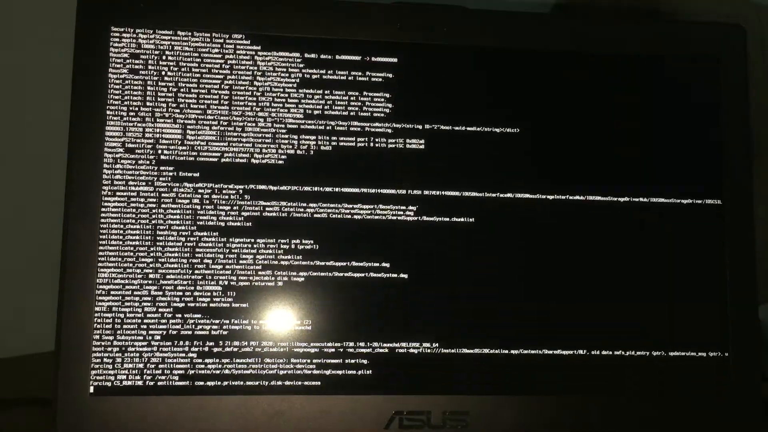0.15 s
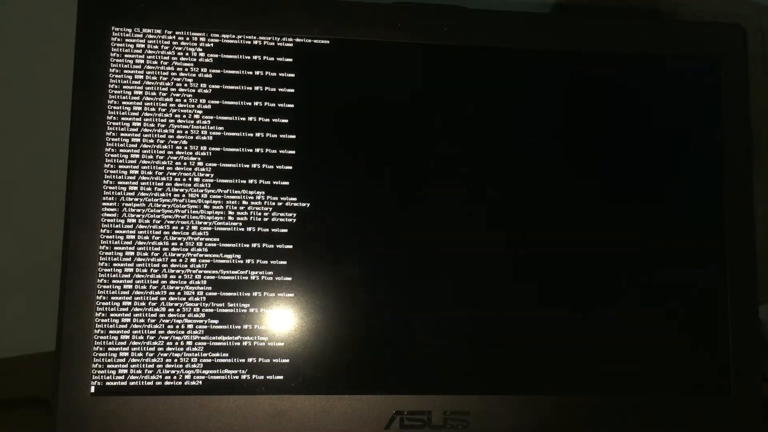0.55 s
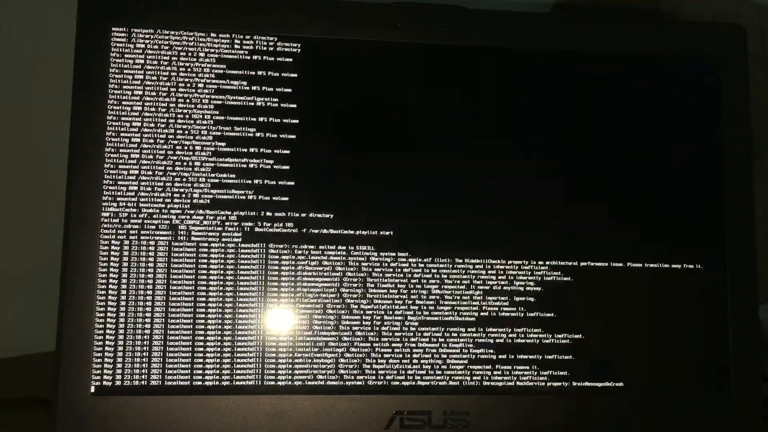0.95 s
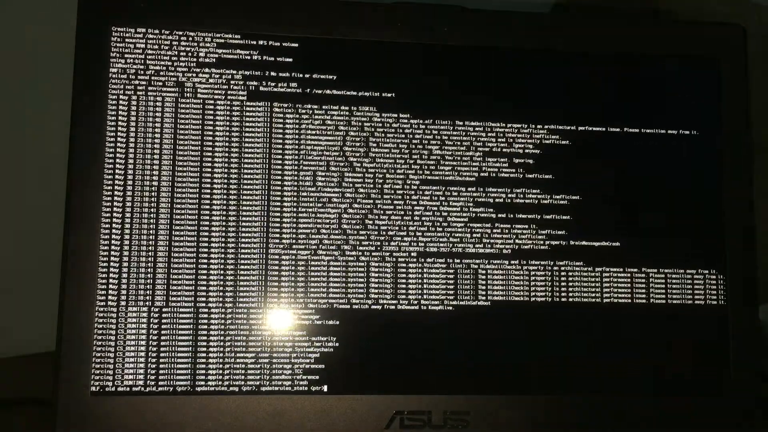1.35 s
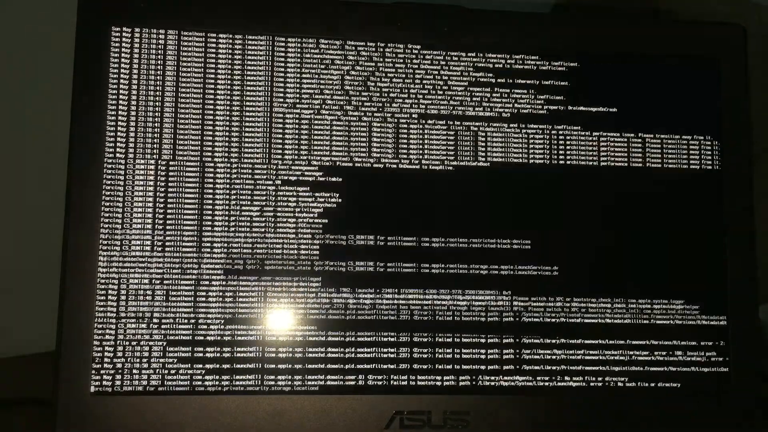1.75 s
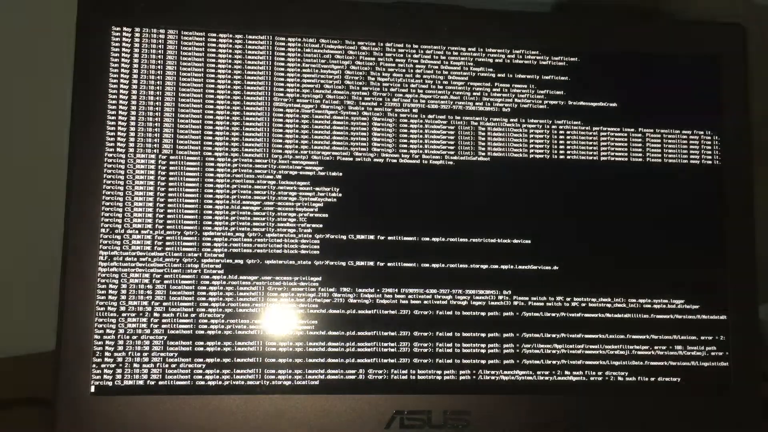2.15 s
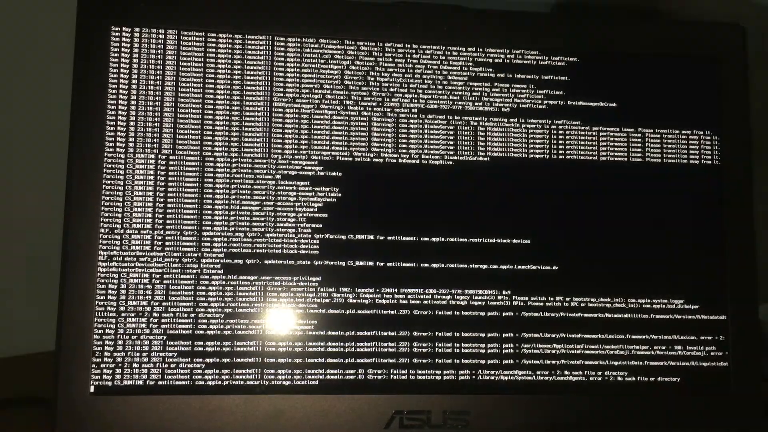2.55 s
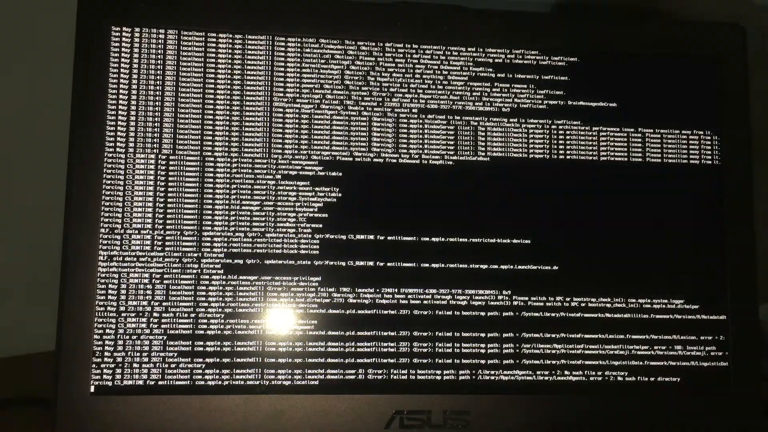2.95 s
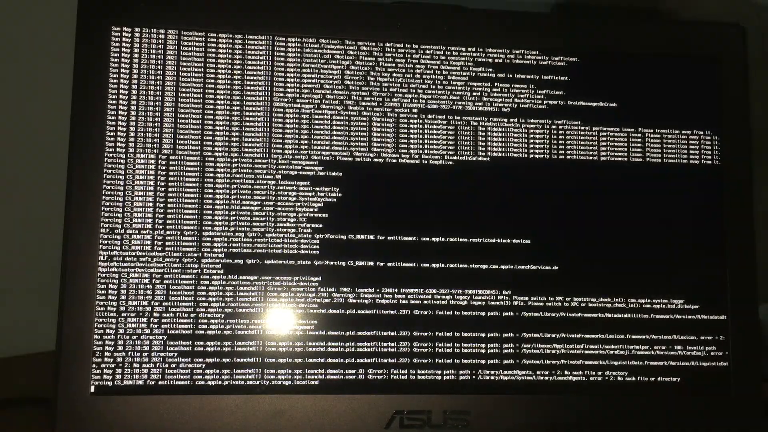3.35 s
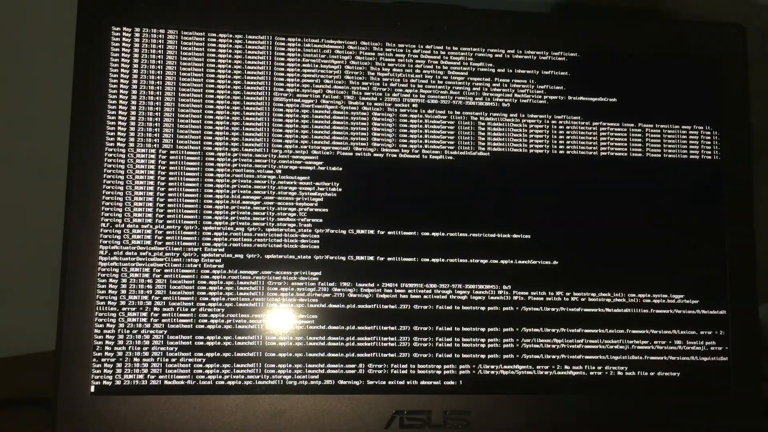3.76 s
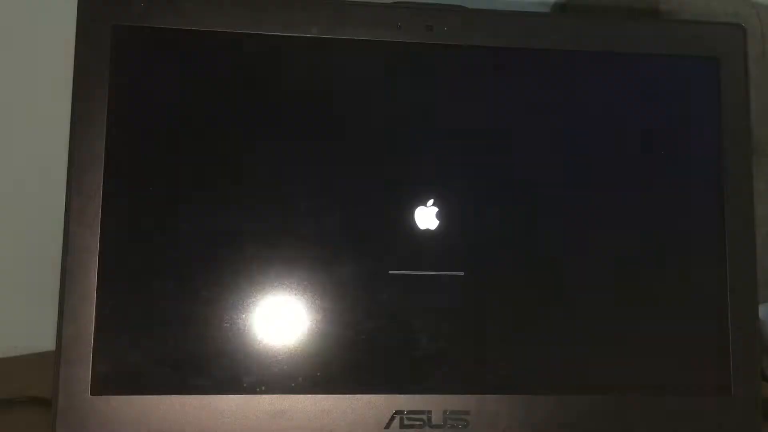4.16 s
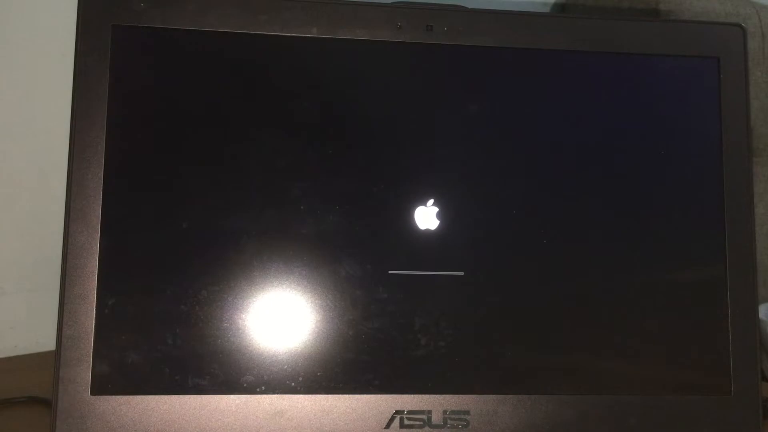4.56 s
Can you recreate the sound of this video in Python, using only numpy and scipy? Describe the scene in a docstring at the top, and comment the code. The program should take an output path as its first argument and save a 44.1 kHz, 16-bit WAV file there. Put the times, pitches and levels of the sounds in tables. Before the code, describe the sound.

Steady air noise rushes through a laptop's vents, slightly grainy and hollow from the case, with several weak high whines and a barely audible low hoot coming and going. Over it, fingers on the phone make bright dry ticks, some with soft low thuds, and a few tiny chirping clicks stand out. Faint disk-arm ticks cluster late. Mono, close, hand-held, in a quiet room with hardly any reverberation.

```python
"""Air hisses without a break through a laptop's vents and case cavities, close to a hand-held phone in
a quiet room: noise, coloured and lifted at the cavities. Thin whines, a fan tone that steps down and
a low, fading hoot are wavering sines; short blips are sliding sines. Fingers tick (dying noise) and
thud (a push on a ringing shell) on the phone, the disk arm ticks with its own modes, and the microphone hisses."""
import sys
import numpy as np
from scipy import signal
from scipy.fft import rfft, irfft, next_fast_len
from scipy.io import wavfile
from scipy.ndimage import uniform_filter1d, map_coordinates

SR = 44100
rng = np.random.default_rng(int(sys.argv[2]) if len(sys.argv) > 2 else 0)


def linear_from_db(decibels):
    """Turn decibels (scalar or array-like) into linear amplitude factors; 0 gives 1."""
    return 10 ** (np.asarray(decibels, float) / 20)


def file_out(sig):
    """Save sig as 16-bit WAV at sys.argv[1]."""
    # one column per channel
    cols = np.atleast_2d(sig).T
    # limit, then scale
    lim = np.clip(cols, -1, 1)
    pcm = np.round(lim * 32767).astype(np.int16)
    wavfile.write(sys.argv[1], SR, pcm)


N = 208054  # length in samples

# colour of the air noise before the cavities lift it: pitch_hz, relative level_db (per Hz)
AIR_COLOUR = [(20, -38), (150, -41), (600, -37.5), (720, -24.5), (1100, -21), (1400, -13), (1650, -20),
              (1800, -13.5), (2300, -13), (3200, -5.5), (4000, -3.5), (5000, -12), (5600, -19),
              (7500, -25.5), (10000, -35.5), (16500, -33)]
# pitches of the case cavities that the air excites: pitch_hz
CAVITY_PITCHES = [745, 1225, 1280, 2400, 2580, 2880, 2945, 3760, 4020, 4340, 4580, 5250, 5685, 6420]
# shape of each cavity, in the same order: width_hz, lift_db over the air
CAVITY_SHAPES = [(40.4, 8), (67, 7.8), (98, 8.8), (114, 10), (80.5, 6.2), (143, 10.96), (68, 9.2), (152, 6),
                 (50.4, 5), (99, 1.2), (99, 1.9), (100, 4.5), (61, 3.5), (100, 2.5)]
# steady whines: pitch_hz, level_db (rms), wander_hz, flutter_db
WHINES = [(978, -82, 1, 1.5), (1186, -81, 2, 2), (1221, -77, 5, 6), (1323, -64.3, 1.2, 1.5),
          (1921, -79, 2, 2), (1944, -74.5, 3, 2), (2004, -71.5, 4, 2.5), (2350, -64, 1.5, 2.5),
          (4020, -70, 8, 3)]
# fan blade tone, stepping down once: start_s, pitch_hz, level_db (rms)
BLADE_TONE = [(0, 1526, -66), (2.13, 1526, -67), (2.27, 1487, -71), (4.72, 1486, -69)]
# short rounded blips: peak_s, level_db (peak), start_hz, end_hz, length_s
SLIDING_BLIPS = [(.627, -51.5, 980, 850, .01), (.8282, -35.5, 2750, 2050, .006),
                 (1.2683, -28.5, 2150, 2500, .0026), (1.93, -68, 950, 840, .09),
                 (2.071, -40, 1800, 1100, .002), (2.245, -65, 680, 600, .014), (2.5, -67, 836, 834, .27),
                 (2.5017, -31, 2700, 1900, .0016), (2.502, -44, 1500, 1000, .0025),
                 (2.508, -38, 3600, 2300, .007), (2.59, -66, 790, 740, .06)]
# finger ticks on the shell: start_s, level_db (crackle rms before its fade), centre_hz, t60_s (3 ms at least)
FINGER_TICKS = [(0.0578, -39.5, 9600, 0.022), (0.0926, -43, 12000, 0.01), (.121, -52, 11300, .019),
                (.1732, -46, 11400, 0.026), (0.247, -51, 14700, .009), (.2684, -54, 7250, 0.022),
                (.3063, -45, 11900, .008), (.581, -55, 9000, 0.014), (.6912, -56, 13900, .036),
                (1.188, -50, 11700, .006), (1.1908, -46.5, 8500, .022), (1.2678, -51, 13900, .013),
                (1.517, -47.5, 11400, .025), (1.579, -51, 7700, .009), (1.9823, -41.5, 9700, 0.022),
                (2.175, -52.5, 13000, .032), (2.2416, -54, 11100, .009), (2.488, -50, 11000, .019),
                (2.5012, -32.5, 11300, .017), (2.5345, -53, 7860, .021), (2.6246, -48.5, 9700, .007),
                (2.8599, -48, 12700, .008), (2.9418, -47.5, 12000, 0.014), (3.0978, -47.5, 12800, .024),
                (3.153, -47, 12700, .008), (3.1578, -46.5, 13500, .016), (3.8494, -48.5, 13700, .01),
                (3.8754, -44, 14100, .008), (3.9341, -57, 11400, .014), (3.957, -49.5, 9600, .011)]
# low thuds of the shell, most of them under the finger ticks: start_s, level_db (peak), centre_hz
SHELL_THUDS = [(.0576, -47, 269), (0.0933, -63, 400), (.121, -61, 300), (.1732, -51, 430),
               (0.1927, -70, 400), (1.0933, -59.5, 540), (1.1877, -66, 400), (1.517, -46, 510),
               (1.58, -70, 400), (1.9822, -45.5, 370), (2.174, -67, 400), (2.4877, -59, 300),
               (2.5007, -75, 400), (2.625, -59.5, 450), (2.9425, -69, 400), (3.0974, -63, 500),
               (3.8496, -65, 250), (3.875, -66, 250), (3.9333, -64, 280)]
# modes of the phone's shell: pitch_hz, width_hz, relative level_db
SHELL_MODES = [(126, 200, 6.5), (322, 82, 6), (584, 150, 5.5), (980, 240, 7)]
# disk arm seeks: start_s, relative level_db
ARM_SEEKS = [(0.2283, -54.5), (3.585, -57), (3.7043, -56.5), (3.797, -57), (3.8851, -56.5), (4.5128, -56.5)]
# what the arm rings with: pitch_hz, relative level_db, time to the peak_s
ARM_MODES = [(13050, -7, 0.0014), (11600, -14.5, 0.0024), (11400, -3, 0.0033), (10800, -2, 0.00062),
             (9500, -1.5, 0.0036), (7900, -8, 0.0049), (7700, -6, 0.0035)]
# a few hand-placed humps of the hoot, some faint: peak_s, level_db (rms), length_s
HOOT_HUMPS = [(0.047, -72.5, .16), (0.256, -71.5, .18), (0.497, -81, 0.25), (0.713, -79, 0.053),
              (1.798, -72, 0.13), (2.105, -78, .12), (2.24, -67.5, 0.084), (2.779, -63, 0.036),
              (2.832, -61, 0.07), (3.232, -65.5, 0.017), (3.852, -70, 0.16), (4.063, -77, .2),
              (4.261, -72, 0.08), (4.558, -73.5, 0.11)]


def unit(x):
    """Scaled to rms 1."""
    return x / np.sqrt(np.mean(x ** 2) + 1e-20)


def wobble(rate):
    """A smooth curve through random knots, rate of them a second."""
    knots = rng.standard_normal(int(N * rate / SR) + 4)
    return map_coordinates(knots, [np.arange(N) * rate / SR])


def curves(rows):
    """One value per sample for each column after the time."""
    times, *columns = np.transpose(rows)
    return [np.interp(np.arange(N) / SR, times, column) for column in columns]


def filtered(x, response):
    """x shaped by a response, a function of frequency that may be complex."""
    size = next_fast_len(len(x) + 8192)
    spectrum = rfft(x, size) * response(np.fft.rfftfreq(size, 1 / SR))
    return irfft(spectrum, size)[:len(x)]


def resonance(f, hz, width):
    """Response of something that rings at hz after it is struck, with top gain 1."""
    return 1j * f * width / (hz * hz - f * f + 1j * f * width)


def tone(hz, db, wander_hz, flutter_db):
    """A sine whose pitch and level are never quite still."""
    phase = 2 * np.pi * np.cumsum(hz + wander_hz * wobble(14)) / SR
    return np.sqrt(2) * linear_from_db(db + flutter_db * wobble(18)) * np.sin(phase)


def add(track, start_s, sound):
    """Mixes a sound in from a given time."""
    part = track[max(round(start_s * SR), 0):][:len(sound)]
    part += sound[:len(part)]


def air(level_db=-47.5, patchy_db=0.8, gust_db=1.5, gust_rate=400):
    """Turbulent noise, patchy in time and pitch and gusting fast, lifted where the cavities resonate."""
    spectrum = signal.stft(rng.standard_normal(N + 512), nperseg=256)[2]
    patches = uniform_filter1d(rng.standard_normal(spectrum.shape), size=5, axis=0)
    patches = uniform_filter1d(patches, size=4, axis=1)
    eddies = signal.istft(spectrum * linear_from_db(patchy_db * unit(patches)), nperseg=256)[1][:N]
    # fast gusts, with slower and weaker ones under them
    eddies = eddies * linear_from_db(gust_db * wobble(gust_rate) + 0.3 * wobble(25) + 0.2 * wobble(4))
    pitch_hz, level = np.transpose(AIR_COLOUR)

    def colour(f):
        lift_db = sum(lift * abs(resonance(f, hz, width)) ** 4
                      for hz, (width, lift) in zip(CAVITY_PITCHES, CAVITY_SHAPES))
        return linear_from_db(np.interp(np.log(f + 1), np.log(pitch_hz), level) + lift_db)

    return linear_from_db(level_db) * unit(filtered(eddies, colour))


def whine():
    """Wavering sines: the steady whines, and the blade tone that drops as the fan slows a little."""
    steady = sum(tone(*row) for row in WHINES)
    return steady + tone(*curves(BLADE_TONE), wander_hz=1.4, flutter_db=0.82)


def blips(echo_db=-10, echo_s=0.00393):
    """Each is a sliding sine under a smooth hump, answered by one echo from the desk."""
    track = np.zeros(N)
    for peak_s, db, start_hz, end_hz, length_s in SLIDING_BLIPS:
        count = round(length_s * SR)
        phase = 2 * np.pi * np.cumsum(np.linspace(start_hz, end_hz, count)) / SR
        hump = np.sin(np.linspace(0, np.pi, count)) ** 1.6
        blip = linear_from_db(db) * hump * np.sin(phase)
        add(track, peak_s - length_s / 2, blip)
        add(track, peak_s - length_s / 2 + echo_s, linear_from_db(echo_db) * blip)
    return track


def fingers(skirt_gain=1.0, tail_db=-22, tail_t60=0.17, faint_count=10):
    """A tick is a bright noise crackle that dies fast, with a faint room tail."""
    track, t = np.zeros(N), np.arange(SR // 10) / SR
    # fainter ticks fall at random times, around -62 dB and 11 kHz
    faint = [(a * N / SR, -62 + 4 * (b - 0.5), 11000 * (0.7 + 0.6 * c), 0.02)
             for a, b, c in rng.random((faint_count, 3))]
    for start_s, db, hz, t60 in FINGER_TICKS + faint:
        # a bright centre over a broad skirt that holds no bass
        colour = lambda f: resonance(f, hz, 0.55 * hz) ** 2 + skirt_gain * resonance(f, 5000, 12000) ** 2
        crackle = unit(filtered(rng.standard_normal(len(t)), colour))
        fade = linear_from_db(-60 * t / max(t60, 0.003)) + linear_from_db(tail_db - 60 * t / tail_t60)
        onset = np.minimum(t / 0.0001, 1)
        add(track, start_s, linear_from_db(db) * fade * onset * crackle)
    return track


def thuds(push_s=0.0004):
    """A short push rings the shell; where the finger lands decides which modes speak."""
    track, t = np.zeros(N), np.arange(SR // 10) / SR
    push = np.sin(np.pi * np.minimum(t / push_s, 1)) ** 2
    # neighbouring modes have opposite signs
    modes = [filtered(push, lambda f: (-1) ** k * linear_from_db(db) * resonance(f, hz, width))
             for k, (hz, width, db) in enumerate(SHELL_MODES)]
    for start_s, db, centre_hz in SHELL_THUDS:
        thud = sum(abs(resonance(hz, centre_hz, 0.99 * centre_hz)) * mode
                   for (hz, _, _), mode in zip(SHELL_MODES, modes))
        add(track, start_s, linear_from_db(db) * thud / abs(thud).max())
    return track


def disk(rough=0.62):
    """Each seek swells and fades through the arm's modes, at new strengths and with a rattle."""
    track, t = np.zeros(N), np.arange(SR // 20) / SR
    hz, db, peak_s = np.transpose(ARM_MODES)[:, :, None]
    swell = (t / peak_s * np.exp(1 - t / peak_s)) ** 2
    for start_s, seek_db in ARM_SEEKS:
        chance = rng.standard_normal((len(ARM_MODES), len(t)))
        rattle = 1 + rough * unit(uniform_filter1d(chance, size=40, axis=1))
        # the first two random columns also set each mode's strength and starting phase
        strength = linear_from_db(db + 2 * chance[:, :1])
        rings = strength * swell * rattle * np.sin(2 * np.pi * (hz * t + chance[:, 1:2]))
        add(track, start_s, linear_from_db(seek_db - 2.0) * rings.sum(axis=0))
    return track


def hoot(pitch_hz=731.5, usual_db=-79.5, fading_db=3, fades_per_s=14):
    """A weak low tone that fades at random, with a few smooth humps, some faint, added by hand."""
    t = np.arange(N) / SR
    humps = sum(linear_from_db(db) * np.cos(np.pi * np.clip((t - peak_s) / length_s, -0.5, 0.5)) ** 2
                for peak_s, db, length_s in HOOT_HUMPS)
    fading = linear_from_db(usual_db + fading_db * wobble(fades_per_s))
    return (fading + humps) * tone(pitch_hz, 0, wander_hz=2.1, flutter_db=1)


def microphone_hiss(level_db=-77.0):
    """The microphone's own noise, equally strong at every pitch."""
    return linear_from_db(level_db) * rng.standard_normal(N)


def scene():
    """Machine, hand and microphone hiss added together, as one channel."""
    machine = air() + whine() + blips() + disk() + hoot()
    hand = fingers() + thuds()
    return (machine + hand + microphone_hiss())[None]


def roll_off(x):
    """The treble ends steeply here."""
    return signal.sosfilt(signal.butter(12, 16510, fs=SR, output="sos"), x)


def record(dry):
    """The phone keeps nothing from its band limit of 15.8 kHz upwards."""
    mix = filtered(dry[0], lambda hz: hz < 15800)[None]
    return roll_off(mix)


dry = scene()
out = record(dry)
file_out(out)
```